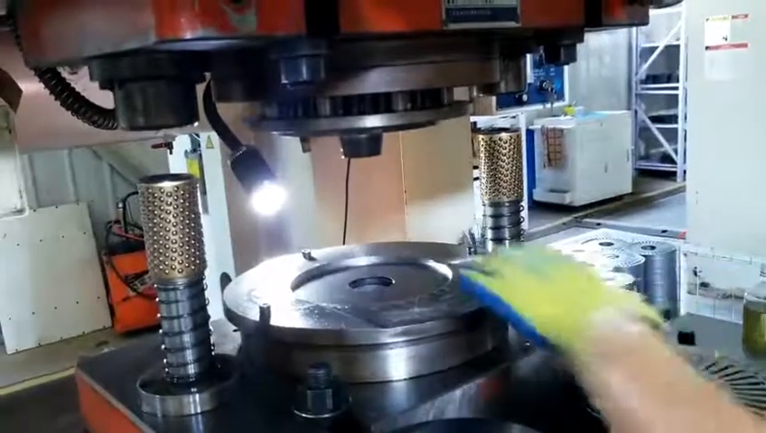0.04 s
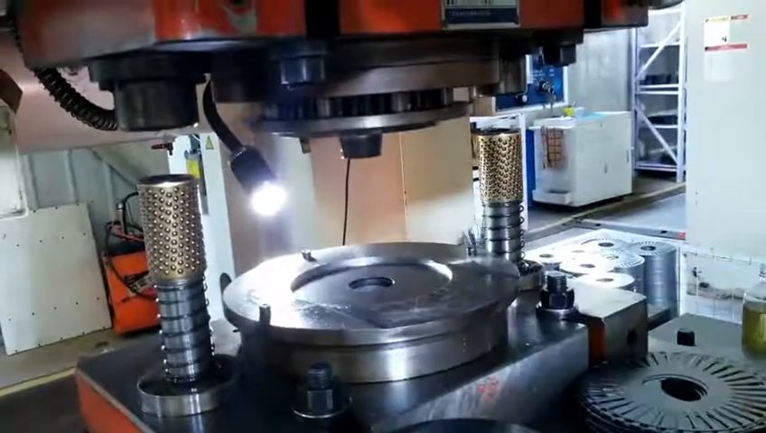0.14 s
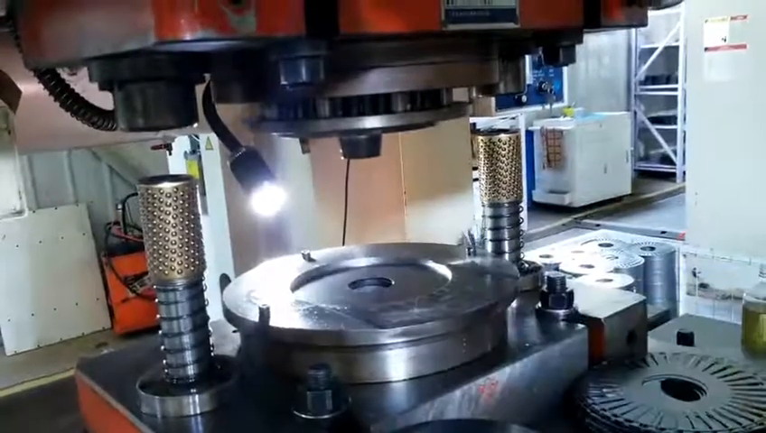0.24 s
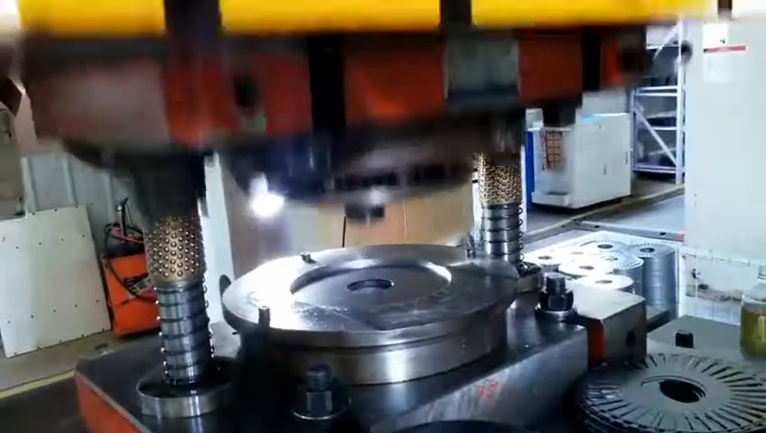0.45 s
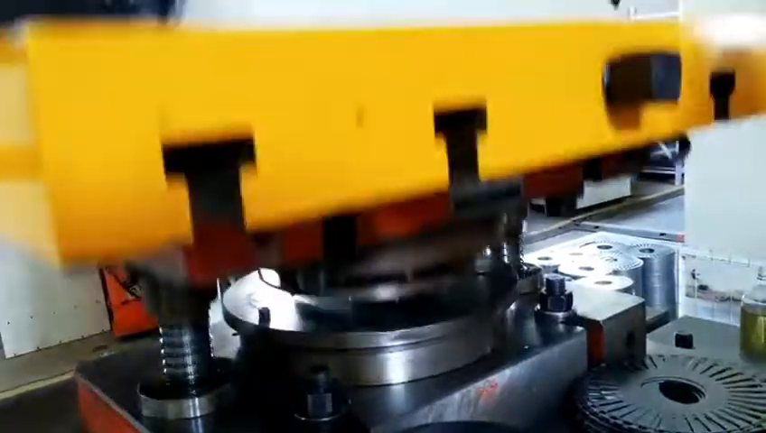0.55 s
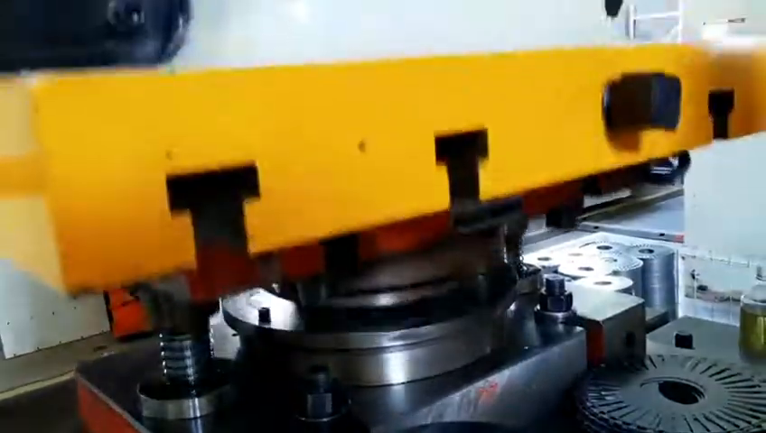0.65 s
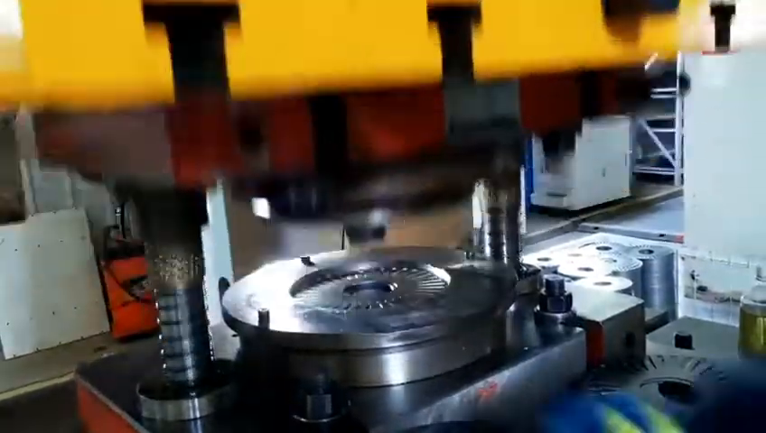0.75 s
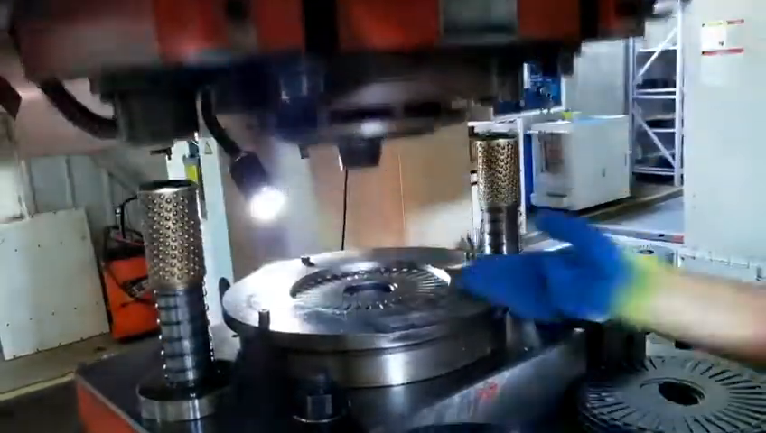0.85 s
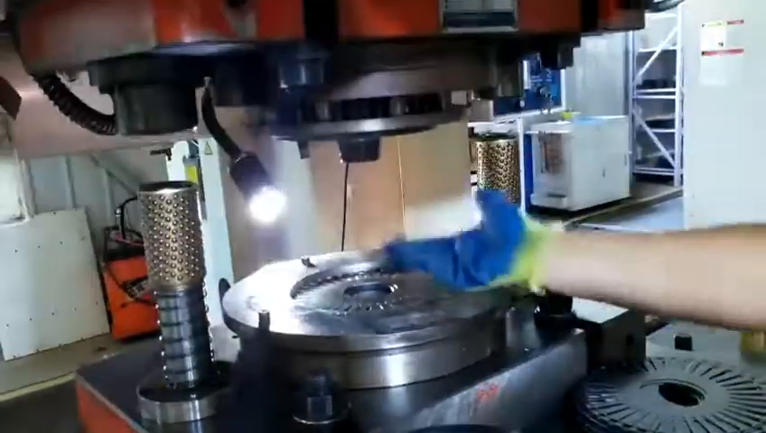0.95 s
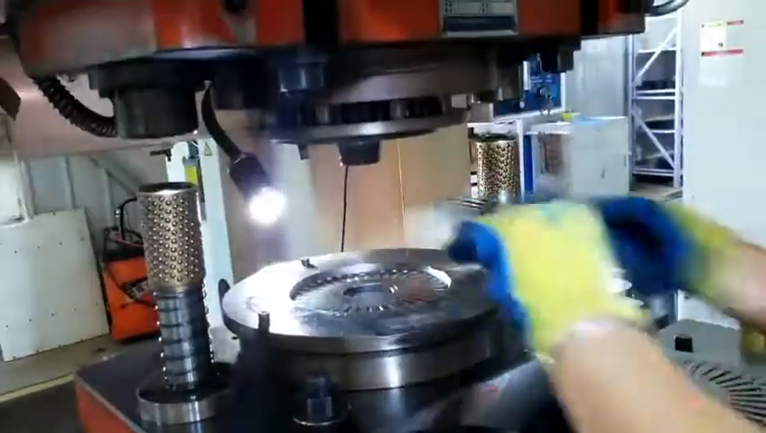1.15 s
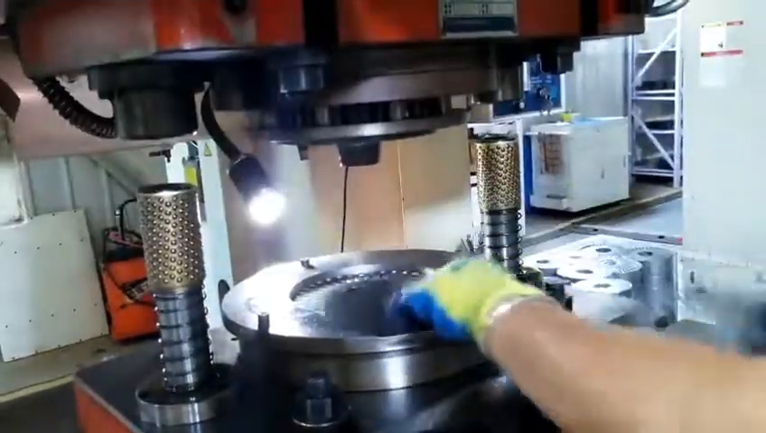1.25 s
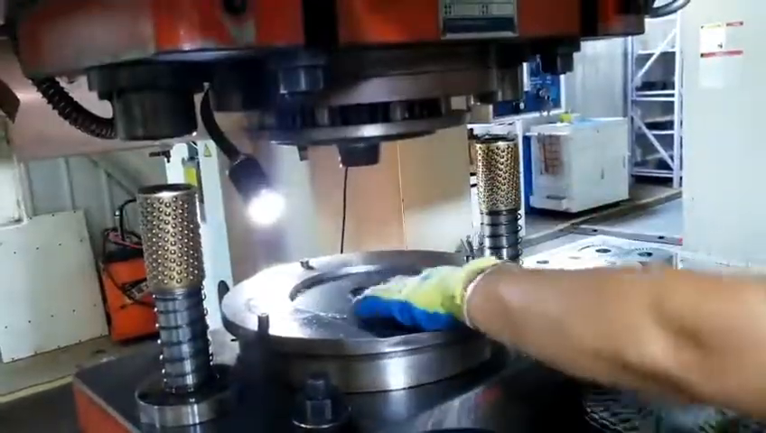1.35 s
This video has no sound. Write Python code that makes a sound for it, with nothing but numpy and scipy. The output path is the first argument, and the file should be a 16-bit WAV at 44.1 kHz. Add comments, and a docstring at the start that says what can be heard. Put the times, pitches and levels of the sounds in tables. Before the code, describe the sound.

A heavy stamping press makes one stroke: hissing valve and deep clunk, sharp metal strike on the die, then clanking plates and jingling parts as it lifts; close microphone in a large, rumbling, reverberant workshop.

```python
"""A large stamping press makes one stroke in a big workshop, over a steady far rumble of coloured noise.
The clutch engages with a valve blast (fluttering noise), thuds (decaying sines) and jolts of the frame
(noise bursts); sliding steel squeals thinly, then the punch strikes the die (noise cracks and ringing modes).
Loose parts jingle and plates clank as the ram lifts and brakes; a gloved hand scrapes off the pinging part.
The hall answers every blow with a decaying noise tail; a close phone microphone clips on the loudest."""
import sys
import numpy as np
from scipy import signal
from scipy.fft import rfft, irfft, next_fast_len
from scipy.io import wavfile
from scipy.ndimage import map_coordinates

SR = 44100
rng = np.random.default_rng(int(sys.argv[2]) if len(sys.argv) > 2 else 0)


def how_loud(loudness_db):
    """Turn decibels into a plain amplitude multiplier (0 dB gives 1, 20 dB gives 10)."""
    steps = np.asarray(loudness_db, float) / 20
    return 10 ** steps


def to_wav(sig):
    """Store sig (one row per channel, or 1-D mono) as 16-bit WAV at the path in sys.argv[1].

    Samples outside -1..1 are clipped; the rate is SR.
    """
    pcm = np.clip(np.atleast_2d(sig), -1, 1) * 32767
    pcm = np.round(pcm).astype(np.int16)
    wavfile.write(sys.argv[1], SR, pcm.T)  # frames by channels


N = 61739  # samples, 1.4 s

RING_WET_DB = -22  # hall level on ringing steel


def unit(x):
    """Bring to rms 1."""
    return x / np.sqrt(np.mean(x ** 2) + 1e-20)


def along(points, hz):
    """Read (Hz, value) points on a log frequency axis."""
    f, v = np.transpose(points)
    return np.interp(np.log(hz + 1), np.log(f + 1), v)


def filtered(x, response):
    """Multiply the spectrum of x by a response of frequency."""
    size = next_fast_len(x.shape[-1] + 8192)
    spectrum = rfft(x, size) * response(np.fft.rfftfreq(size, 1 / SR))
    return irfft(spectrum, size)[..., :x.shape[-1]]


def wobble(rate):
    """A smooth random curve through normal knots, rate of them a second."""
    return map_coordinates(rng.standard_normal(1000), [np.arange(N) * rate / SR])


def spread(pair, gain_db=lambda hz: 0 * hz):
    """Mix two unrelated signals into left and right, alike in the bass."""
    # Likeness of the two sides. Each row: frequency in Hz, left-right correlation (1 = identical).
    alike = [(100, 1), (300, 0.95), (700, 0.46), (1500, 0.01), (8000, 0.027)]

    def mid_side_gains(hz):
        turn = np.arccos(np.clip(along(alike, hz), -1, 1)) / 2
        return how_loud(gain_db(hz)) * [np.cos(turn), np.sin(turn)]

    mid, side = filtered(pair, mid_side_gains)
    return np.array([mid + side, mid - side])


def rush(gain_db):
    """Stereo noise of rms 1, coloured by a gain in dB over frequency."""
    return unit(spread(rng.standard_normal((2, N)), gain_db))


def swell(start, rise, t60):
    """Rise with a time constant, under an exponential decay of 60 dB in t60 seconds."""
    t = np.maximum(np.arange(N) / SR - start, 0)
    return (1 - np.exp(-t / rise)) * how_loud(-60 * t / t60)


def gate(start, length, edge):
    """On for a length, with soft edges."""
    t = np.arange(N) / SR - start
    return np.clip(np.minimum(t, length - t) / edge + .5, 0, 1)


def sides(pan_db):
    """Left and right gains; positive pan is louder on the left."""
    return how_loud([[pan_db / 2], [-pan_db / 2]])


def ears():
    """Random start phases of a tone, left and right about a quarter cycle apart."""
    start, way, slip = rng.random(3)
    half_gap = np.sign(way - .5) * (np.pi / 4 + .5 * (slip - .5))
    return 2 * np.pi * start + half_gap * np.array([[1], [-1]])


def hall(x, wet_db):
    """Direct sound plus a delayed noise tail whose decay time depends on frequency."""
    # Reverberation of the workshop. Each row: frequency in Hz, t60 in seconds.
    hall_t60 = [(60, 0.23), (150, 0.84), (300, 1.38), (1000, 2), (4000, 1.43), (12000, 0.81)]
    hz, t, z = signal.stft(rng.standard_normal((2, SR * 3 // 2)), SR, nperseg=256)
    decay = how_loud(-60 * t / along(hall_t60, hz)[:, None])
    tail = spread(signal.istft(z * decay, SR, nperseg=256)[1])
    tail = tail / np.linalg.norm(tail[0])
    late = np.pad(x.mean(axis=0), (round(.008 * SR), 0))[None]  # 8 ms behind the direct sound
    return x + how_loud(wet_db) * signal.fftconvolve(late, tail, axes=1)[:, :N]


def single_rings(rows, t60):
    """Short decaying sines, one for each row: start in seconds, frequency in Hz, level in dB."""
    t, rise = np.arange(N) / SR, .003  # s
    rings = sum(how_loud(db) * swell(s, rise, t60) * np.sin(2 * np.pi * hz * t + ears()) for s, hz, db in rows)
    return hall(rings, RING_WET_DB)


def blows(rows, colour, modes, wet_db):
    """Each blow is a noisy crack plus the object's modes, rung anew with scattered levels."""
    rattle_db, rattle_rad, rattle_per_s = 3, 1.0, 130
    scatter_db = 2
    out, t = 0, np.arange(N) / SR
    # loose parts chatter, which roughens every ring in level and phase
    chatter = [(rattle_db * wobble(rattle_per_s), rattle_rad * wobble(rattle_per_s)) for _ in modes]
    for s, crack_db, t60, ring_db, pan_db, rise, tilt in rows:
        crack = how_loud(crack_db) * swell(s, rise, t60) * rush(lambda hz: along(colour, hz))
        ring = 0
        for (hz, db, decay), (shake_db, shake) in zip(modes, chatter):
            level_db = db + tilt * np.log2(hz / 2000) + scatter_db * rng.standard_normal() + shake_db
            tone = np.sin(2 * np.pi * hz * t + ears() + shake)
            ring = ring + how_loud(level_db) * swell(s, rise, decay) * tone
        out = out + hall(crack * sides(pan_db), wet_db)
        out = out + hall(how_loud(ring_db) * ring * sides(pan_db), RING_WET_DB)
    return out


def shop():
    """Other machines far off in the hall: a noise rumble whose level drifts."""
    # Workshop rumble. Each row: frequency in Hz, relative level in dB per Hz.
    rumble_colour = [(12, -69), (20, -33), (128, -10), (224, -8), (295, -4.5), (424, -3.5), (575, -5),
                     (642, 0), (780, -3), (1320, -9.5), (1700, -13), (15200, -40)]
    level_db = -27 + .8 * wobble(12)
    return how_loud(level_db) * rush(lambda hz: along(rumble_colour, hz))


def air():
    """A fluttering noise blast from the clutch valve, stronger on the right."""
    # Course of the blast. Each row: time in seconds, level in dB before flutter and panning.
    blast = [(0.225, -65), (0.241, -38), (0.261, -45.5), (0.296, -17), (0.483, -38.5), (0.543, -54)]
    # Hiss of the valve. Each row: frequency in Hz, relative level in dB per Hz.
    hiss_colour = [(1470, -10), (2500, -10), (4440, -13), (4680, -8.5), (5320, -8.5), (7940, 0.5),
                   (10700, -20), (12300, -23.5), (15200, -25)]
    s, db = np.transpose(blast)
    flutter_db = 1.5 * wobble(150)
    level_db = np.interp(np.arange(N) / SR, s, db, left=-120, right=-120) + flutter_db
    return hall(how_loud(level_db) * rush(lambda hz: along(hiss_colour, hz)) * sides(-7.5), -10.5)


def thuds():
    """Clunks and soft, heavy pushes: decaying low sines with wavering phase, direct sound alike in both ears."""
    # Through bed and floor. Each row: start in seconds, frequency in Hz, level in dB, t60 in seconds.
    pushes = [(0.233, 157, -16, 0.16), (.238, 770, -8.5, 0.07), (.246, 683, -18, 0.11),
              (0.269, 95, -14, 0.18), (0.295, 62, -16, 0.15), (0.562, 70.6, -25, 0.14),
              (.59, 115.6, -14.5, 0.3), (0.593, 209, -11, 0.48), (0.849, 77.12, -13.5, 0.042)]
    t = np.arange(N) / SR
    push = 0
    for s, hz, db, t60 in pushes:
        tone = np.sin(2 * np.pi * hz * (t - s) + .5 * wobble(30.04))
        push = push + how_loud(db) * swell(s, 0.0025, t60) * tone
    return hall(np.array([push, push]), -9)


def lift(peaks, hz):
    """Resonances as dB humps over frequency."""
    return sum(db / (1 + ((hz - centre) / width) ** 2) for centre, width, db in peaks)


def frame():
    """Each jolt shakes the cast frame: dense low noise with a few favoured resonances."""
    # Jolts of the press frame. Each row: start in seconds, level in dB, rise time constant in seconds,
    # t60 in seconds, tilt in dB per octave about 500 Hz.
    jolts = [(0.237, -13.5, 0.0051, 0.18, 2), (0.266, -5, 0.012, 0.41, -1.5), (0.295, -4.5, 0.018, 0.56, 1),
             (0.378, -3.5, 0.015, 0.34, 1.5), (.43, -14, 0.01, 0.95, 1.5), (0.562, -6.5, 0.0038, 0.15, 3),
             (0.593, -4.5, 0.011, 0.23, -2.5), (0.659, -17, 0.02, 1, 2.5), (0.847, -17.5, 0.0076, 0.15, -5),
             (0.908, -4, 0.017, 0.15, 0)]
    # Colour of the frame. Each row: frequency in Hz, relative level in dB per Hz.
    frame_colour = [(15, -52), (25, -25), (188, -8.5), (565, -7), (620, -4), (1520, -19.5), (2690, -26),
                    (2880, -22), (3090, -25.5), (6000, -33), (7800, -35.5), (13200, -120)]
    # Resonances of the frame. Each row: centre in Hz, half width in Hz, lift in dB.
    frame_peaks = [(209, 30, -2), (250, 50, 6), (532, 48, 3.5), (610, 30, -1.5), (720, 61, 3.5),
                   (1180, 190, 6.5)]
    out = 0
    for s, db, rise, t60, tilt in jolts:
        def gain_db(hz):
            return along(frame_colour, hz) + lift(frame_peaks, hz) + tilt * np.log2((hz + 20) / 500)
        out = out + hall(how_loud(db) * swell(s, rise, t60) * rush(gain_db), -0.5)
    return out


def squeals():
    """Thin tones, wavering in level and phase, while steel slides on steel."""
    # Squeals. Each row: start in seconds, length in seconds, frequency in Hz,
    # level in dB before wavering, fade in dB per second.
    slides = [(.357, .018, 2915, -20, 0), (.383, .064, 2911, -17, 90), (.596, .06, 2909, -21, 25),
              (.583, .08, 6963, -17, 108), (.618, .035, 4250, -29, 0), (.955, .026, 6870, -34, 0)]
    t = np.arange(N) / SR
    tones = 0
    for s, length, hz, db, fade_db in slides:
        level_db = db + 1.2 * wobble(65.5) - fade_db * (t - s)
        tone = np.sin(2 * np.pi * hz * t + ears() + 0.17 * wobble(54.5))
        tones = tones + how_loud(level_db) * gate(s, length, .006) * tone
    return hall(tones, -10)


def stamps():
    """The punch strikes the die: cracks of noise and the ringing modes of the die."""
    # Punch on die. Each row: start in seconds, crack level in dB, crack t60 in seconds, ring gain in dB,
    # pan in dB, rise time constant in seconds, ring tilt in dB per octave about 2000 Hz.
    strikes = [(.551, -8.5, 0.036, 1.5, -1, 0.0016, -2.5), (.565, -3, 0.13, -15, -0.5, 0.0014, 1)]
    # Colour of the crack. Each row: frequency in Hz, relative level in dB per Hz.
    crack_colour = [(350, -7), (600, -10), (1230, -4.5), (2880, -16.5), (3210, -10.5), (4620, -10.5),
                    (5010, -11), (5440, -5), (5900, -14.5), (6310, -11.5), (15200, -37.5)]
    # Modes of the die. Each row: frequency in Hz, relative level in dB, t60 in seconds.
    die_modes = [(1250, -4, .035), (1560, -3, .035), (1900, 2, .035), (2050, -4, .03), (3400, -14, .05),
                 (4600, -10, .04), (5250, -14, .1), (5430, -8, .07), (6400, -11, .05), (8550, -19, .05),
                 (10910, -20, .14)]
    return blows(strikes, crack_colour, die_modes, 0)


def jingle():
    """Loose parts knock at random after the blows, each time on a random, slightly shifted mode."""
    # Modes of loose steel parts: one frequency in Hz each.
    loose_hz = [2090, 2560, 4120, 5200, 5330, 5630, 6850]
    # How hard they jingle. Each row: time in seconds, highest level of a knock in dB.
    strength = [(.57, -23), (0.701, -25), (.85, -23), (.95, -16), (1.079, -35)]
    count, t60, detune_share = 60, .08, .012  # knocks, s, largest shift as a part of the frequency
    s, db = np.transpose(strength)
    when, which, detune, size = rng.random((count, 4)).T
    when = s[0] + (s[-1] - s[0]) * (np.arange(count) + when) / count  # one knock in each time slot
    mode = np.array(loose_hz)[(which * len(loose_hz)).astype(int)]
    hz = mode * (1 + detune_share * (2 * detune - 1))
    level_db = np.interp(when, s, db) - 8 * size
    return single_rings(zip(when, hz, level_db), t60)


def clanks():
    """Steel plates clank on the way up: cracks of noise and the ringing modes of the plates."""
    # Clanks. Each row: start in seconds, crack level in dB, crack t60 in seconds, ring gain in dB,
    # pan in dB, rise time constant in seconds, ring tilt in dB per octave about 2000 Hz.
    knocks = [(.735, -24, 0.27, -22, 5, 0.013, -1), (.792, -9.5, 0.25, -4.5, 2, 0.0053, -3.5),
              (.8215, -6.5, 0.082, -3, -0.5, 0.0011, -0.5), (.841, -7.5, 0.14, -10, 2.5, 0.0037, 2),
              (.848, -6, 0.16, -3.5, -1.5, 0.0032, -1.5), (.866, -13, 0.12, -8, 4, 0.034, 4),
              (.91, -12.5, 0.12, -20, 1.5, 0.0033, -14.5), (.955, -17.5, 0.087, -25.5, 7, .005, -16),
              (1.006, -13, 0.054, -28, -1, 0.0049, 0)]
    # Colour of the crack. Each row: frequency in Hz, relative level in dB per Hz.
    clank_colour = [(350, -54), (600, -52), (841, -5.5), (1280, -5.5), (2770, -12), (3400, -17),
                    (5440, -14), (8380, -20), (8850, -27), (13800, -34.5), (15200, -35)]
    # Modes of the plates. Each row: frequency in Hz, relative level in dB, t60 in seconds.
    plate_modes = [(850, -7, .07), (1015, -2, .07), (1745, -1, .06), (2450, -6, .05), (2620, -5, .07),
                   (2790, -5, .07), (2912, -8, .08), (4120, -14, .13), (5330, -3, .08), (5455, 2, .06),
                   (6070, -9, .05), (6702, -10, .12), (8120, -15, .13), (8253, -13, .15)]
    return blows(knocks, clank_colour, plate_modes, -6)


def scrapes():
    """Glove and part scrape the die close to the microphone: short grainy hisses."""
    # Scrapes. Each row: start in seconds, length in seconds, level in dB before graininess, pan in dB.
    strokes = [(1.201, 0.0058, -30, -2), (1.212, 0.021, -27, 1.5), (1.309, 0.018, -31, 0),
               (1.371, 0.011, -32.5, -2)]
    # Colour of the hiss. Each row: frequency in Hz, relative level in dB per Hz.
    scrape_colour = [(1470, -28), (2500, -9), (4610, -8.5), (5610, -7), (8500, -11), (9100, -18.5),
                     (15200, -20)]
    stroke = sum(how_loud(db) * gate(s, length, 0.0069) * sides(pan_db) for s, length, db, pan_db in strokes)
    grain = how_loud(2.7 * wobble(280))
    return hall(stroke * grain * rush(lambda hz: along(scrape_colour, hz)), -6)


def pings():
    """The thin stamped part pings on the die: single short decaying tones."""
    # Pings. Each row: start in seconds, frequency in Hz, level in dB.
    part_pings = [(1.214, 4940, -21), (1.222, 5520, -20), (1.315, 6150, -24), (1.372, 6450, -27)]
    return single_rings(part_pings, .055)


def scene():
    """All sources together."""
    engaging = air() + thuds() + frame() + squeals()
    striking = stamps() + jingle() + clanks()
    removing = scrapes() + pings()
    return shop() + engaging + striking + removing


def roll_off(x):
    """The treble ends steeply here."""
    return signal.sosfilt(signal.butter(12, 15350, fs=SR, output="sos"), x)


def record(dry):
    """The phone microphone keeps nothing above its band limit and clips softly."""
    ceiling, knee = 1.09, 12  # largest amplitude; a higher knee bends more sharply
    x = filtered(dry, lambda hz: hz < 15400)
    x = x / (1 + np.abs(x / ceiling) ** knee) ** (1 / knee)
    return roll_off(x)


dry = scene()
out = record(dry)
to_wav(out)
```